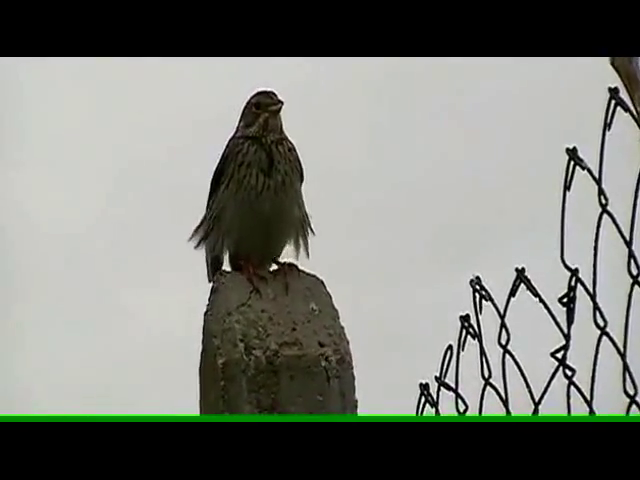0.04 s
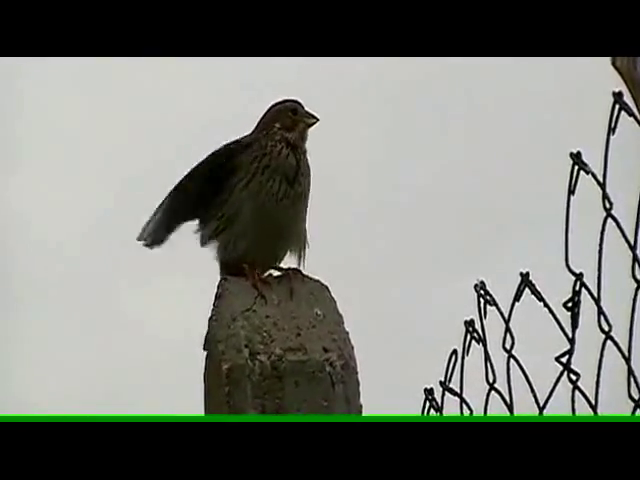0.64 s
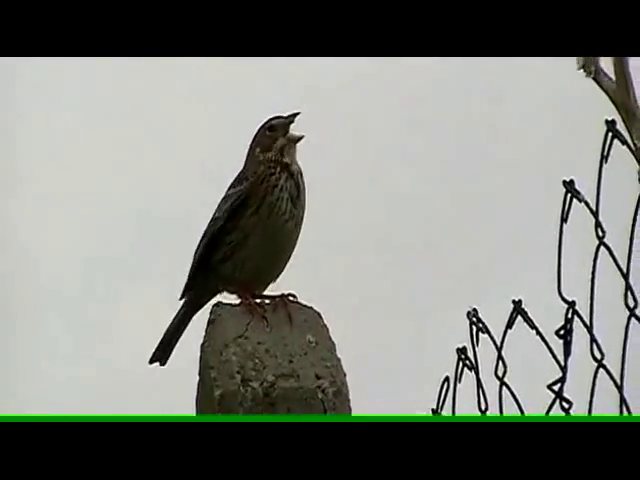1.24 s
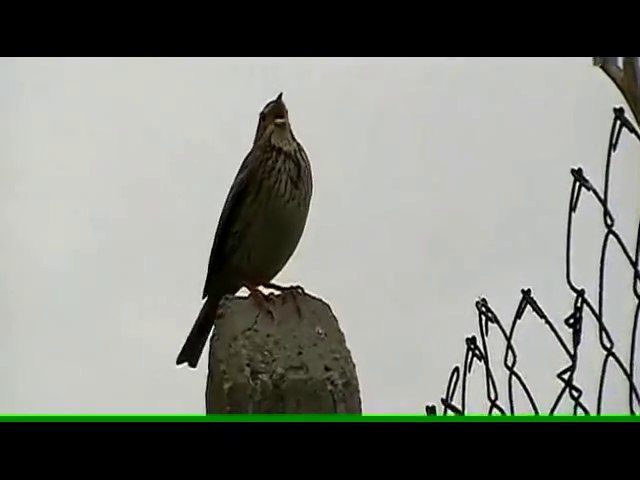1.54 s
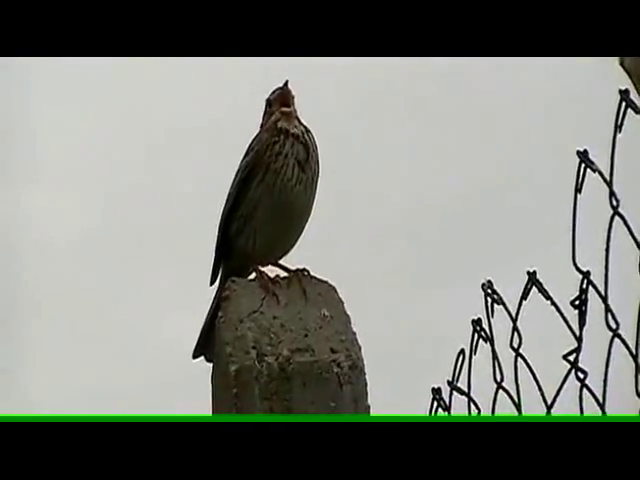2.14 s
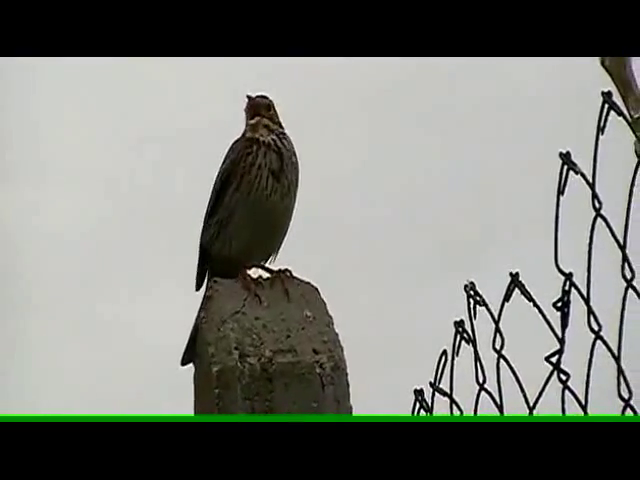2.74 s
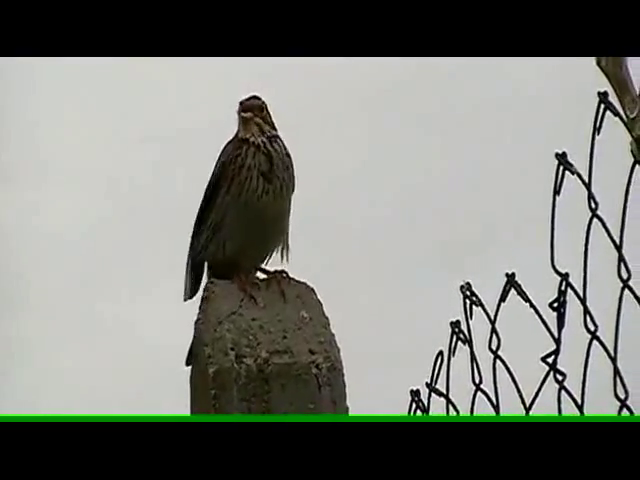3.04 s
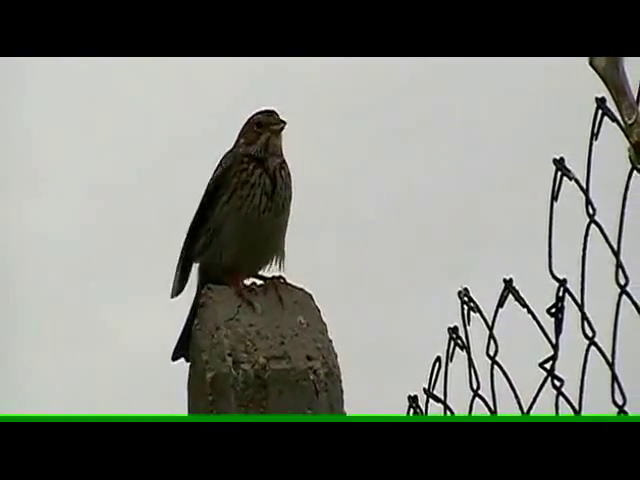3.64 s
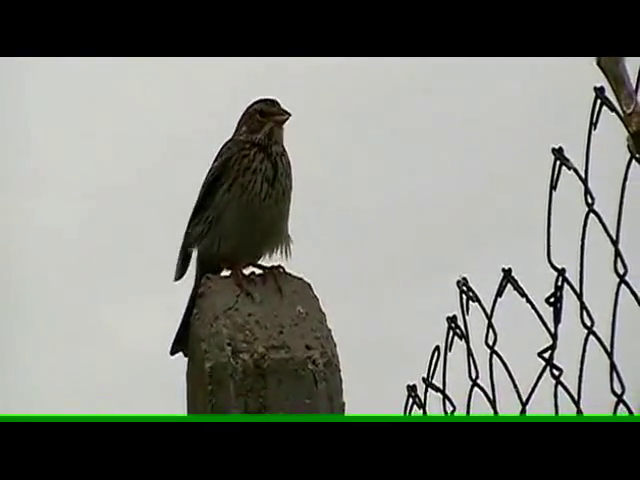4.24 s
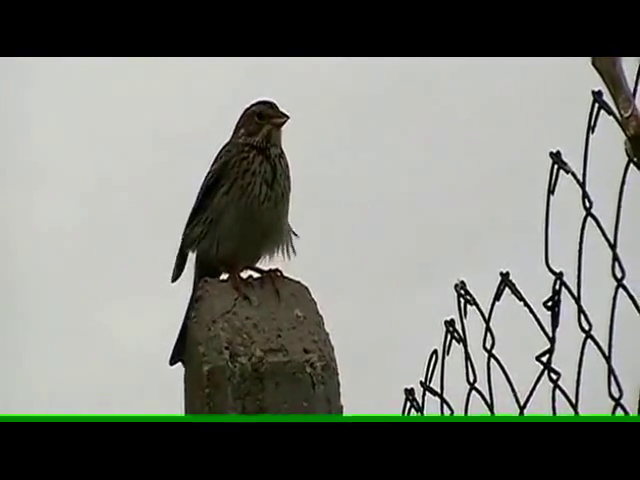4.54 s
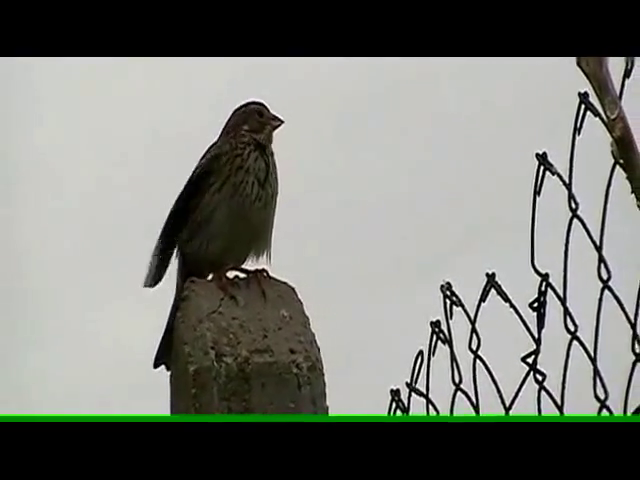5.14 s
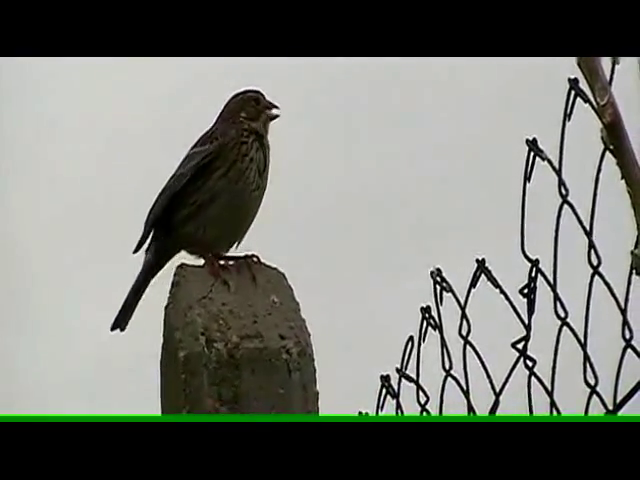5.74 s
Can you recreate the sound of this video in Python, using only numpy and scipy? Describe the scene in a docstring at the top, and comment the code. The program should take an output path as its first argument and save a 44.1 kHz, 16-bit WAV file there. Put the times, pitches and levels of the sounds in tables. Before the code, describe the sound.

A small bird sings close to the microphone in an open field. At about 0.3 seconds it flicks a wing with one faint, fluttering swish. Sharp, high ticks begin at 0.8 seconds and speed up, breaking at 1.7 seconds into a loud, dense jangle of chips, slides and buzzes. A fast warble follows around 2.3 seconds, then bright clinks at 2.6 and falling sweeps from 3 seconds. From about 3.6 to 4.1 seconds the song ends in a softer, slowing trill with a little more echo. After a pause, two new ticks come at 5.6 and 5.9 seconds. Far birds twitter faintly throughout, with thin whistles and pips from about 4.6 seconds. A distant road hums quietly underneath, and light gusts now and then rumble softly on the microphone.

```python
"""In an open field, a corn bunting on a concrete post flicks a wing and sings. Sharp ticks speed up into
a jangle of slides and buzzes from both sides of its syrinx (a bird's two-sided voice box), then come
a warble, clinks and sweeps. It turns its head away for the slowing trill, so nearby echoes take over,
then starts ticking again. Far larks and a distant road lie behind; light gusts touch the microphone."""
import sys
import numpy as np
from scipy import signal
from scipy.fft import rfft, irfft
from scipy.io import wavfile
from scipy.ndimage import uniform_filter1d, map_coordinates

SR = 44100
rng = np.random.default_rng(int(sys.argv[2]) if len(sys.argv) > 2 else 0)


def inscribe(sig):
    """Save sig as 16-bit PCM at rate SR to the path in sys.argv[1].

    A 1-D sig is mono; a 2-D sig holds one channel per row.
    Samples are clipped to [-1, 1] before scaling.
    """
    pcm = np.round(np.clip(np.atleast_2d(sig).T, -1, 1) * 32767)
    wavfile.write(sys.argv[1], SR, pcm.astype(np.int16))


N = 264600
TIME = np.arange(N) / SR
OPPOSITE = np.array([[1], [-1]])   # plus in the left channel, minus in the right
UPPER_VOICE_HZ = 6500   # buzzes above this pitch belong to the upper of the bird's two voices


def from_db(db):
    """Turn decibels into a number to multiply a sound by."""
    return 10 ** (np.asarray(db) / 20)


def unit_power(x):
    """Scale a sound so that its average power is 1."""
    return x / np.sqrt(np.mean(x ** 2) + 1e-20)


def in_time(rows):
    """Join rows of (time, values...) with straight lines, giving each value at every sample."""
    times, *columns = np.transpose(rows)
    return [np.interp(TIME, times, column) for column in columns]


def drift(per_s, size):
    """A smooth random wobble, roughly 1 either way, that finds per_s new values a second."""
    points = np.random.default_rng(rng.integers(1 << 30)).standard_normal(int(size * per_s / SR) + 4)
    return map_coordinates(points, [np.arange(size) * per_s / SR + 1], order=3, mode="nearest")


def noise(colour):
    """Noise of power 1; its colour (rows of f/Hz, level/dB) sets how strong the lows and highs are."""
    hz, db = np.transpose(colour)
    bins = np.maximum(np.fft.rfftfreq(N, 1 / SR), 1)
    gain = from_db(np.interp(np.log(bins), np.log(hz), db))
    low_cut = bins / np.hypot(bins, hz[0] / 2)
    return unit_power(irfft(rfft(rng.standard_normal(N)) * gain * low_cut, N))


def add(track, start_s, sound):
    """Mix a sound into a track at the given time."""
    start = max(int(start_s * SR), 0)
    track[start:start + len(sound)] += sound[:max(N - start, 0)]


def progress(length_s):
    """Count from 0 to 1 over the samples of a note."""
    return np.linspace(0, 1, max(int(length_s * SR), 32))


def series(start_s, gap_s, level_db, count, fade_db=0, slowing_s=0):
    """Rows of t/s, level/dB for a repeated note: gaps grow by slowing_s, levels drop by fade_db."""
    k = np.arange(count)
    return np.column_stack([start_s + gap_s * k + slowing_s * k * (k - 1) / 2, level_db - fade_db * k])


def echoes(x, decay_s, per_s, width, first_s=.002):
    """Scattered echoes that fall 60 dB in decay_s; width sets how much left and right differ."""
    t = np.arange(SR // 2) / SR
    strengths = rng.standard_normal((2, len(t)))
    arrives = (rng.random(len(t)) < per_s / SR) & (t > first_s)
    patterns = strengths * arrives * from_db(-60 * t / decay_s)
    mid, side = [signal.fftconvolve(x, taps / np.sqrt(taps @ taps + 1e-20))[:N] for taps in patterns]
    return mid + width * side * OPPOSITE


def syrinx(hz, gain, waver=0.018, shimmer_db=1.37, octave_db=-27):
    """One vibrating membrane in the voice box: a slightly shaky tone with a weak octave above it."""
    size = len(hz)
    phase = 2 * np.pi * np.cumsum(hz * (1 + waver * drift(900, size))) / SR
    soft_ends = signal.windows.tukey(size, min(1, .0032 * SR / size))
    octave = from_db(octave_db) * (hz < SR / 4) * np.sin(2 * phase)
    shimmer = from_db(shimmer_db * drift(500, size))
    return np.sqrt(2) * gain * soft_ends * shimmer * (np.sin(phase) + octave)


def repeat_note(rows, shape, length_s, waver=0.019):
    """Sing one shape at each t/s, level/dB. A shape's position runs from 0 (note starts) to 1 (ends)."""
    out = np.zeros(N)
    position, hz, db = np.transpose(shape)
    along = progress(length_s)
    pitch = uniform_filter1d(np.interp(along, position, hz), size=30)
    for s, level_db in rows:
        add(out, s, syrinx(pitch, from_db(level_db + np.interp(along, position, db)), waver))
    return out


def slides(rows, arch_db, bend_hz, waver):
    """Notes that glide in a curve from one pitch to another and are loudest in the middle."""
    out = np.zeros(N)
    for s, length_s, start_hz, end_hz, level_db in rows:
        along = progress(length_s)
        arch = 1 / 6 - (2 * along - 1) ** 2
        pitch = start_hz + (end_hz - start_hz) * along + bend_hz * arch
        add(out, s, syrinx(pitch, from_db(level_db + arch_db * arch), waver))
    return out


def buzzes(rows, arch_hz=600, arch_db=6, full_swing_hz=480, slow_per_s=75, wander_hz=80):
    """A fast flutter swings the pitch and pulses the air; a small swing leaves a nearly pure note."""
    out = np.zeros(N)
    for s, length_s, centre_hz, swing_hz, per_s, level_db in rows:
        along = progress(length_s)
        arch = 1 / 4 - (2 * along - 1) ** 2
        swell_db = 2 if centre_hz > UPPER_VOICE_HZ else 7.5
        flutter = 2 * np.pi * np.cumsum(per_s * (1 + .15 * drift(170, len(along)))) / SR
        rough = min(swing_hz / full_swing_hz, 1)
        depth = min(rough ** 2 + (slow_per_s / per_s) ** 2, 1)   # slow flutter breaks into pulses
        pulses = 1 + depth * np.cos(flutter + 0.28)
        flow = pulses * from_db(swell_db * along + arch_db * arch * (1.5 - rough))
        pitch = centre_hz + swing_hz * np.sqrt(rough) * np.sin(flutter) + arch_hz * arch * (1 - rough)
        pitch += wander_hz * rough * drift(110, len(along))
        add(out, s, syrinx(pitch, from_db(level_db) * unit_power(flow), waver=0.032 * rough ** 2))
    return out


def road(side_db=-10, whine_hz=2192, whine_db=-71):
    """The background hum of a distant road, with a thin steady whine in it."""
    # how loud the background hum is; it dips briefly during the loud song: t/s, relative level/dB
    hum_levels = [(0.0, -55.5), (1.61, -54.5), (2.22, -62.5), (2.55, -55), (4.91, -50), (5.87, -52),
                  (5.9, -52)]
    # colour of the hum: f/Hz, level/dB
    colour = [(60, -18.5), (440, -8.5), (560, 1.5), (690, 1), (750, -3.5), (880, 3.5), (970, -7),
              (1110, 5.5), (1300, -3), (1550, 2), (2100, -8.5), (4500, -17.5), (7000, -27.5)]
    level_db, = in_time(hum_levels)
    hum = noise(colour) + from_db(side_db) * noise(colour) * OPPOSITE
    whine = np.sqrt(2) * from_db(whine_db) * np.sin(2 * np.pi * whine_hz * TIME)
    return (from_db(level_db + 0.5) * hum + whine) * from_db(-.6 * OPPOSITE)   # a little to the right


def wind(calm_db=-63.5, gust_s=.1, mid_db=-11):
    """Swirls of air push on the microphone's two openings, mostly in opposite directions."""
    # gusts that rise and die equally fast: t/s, peak level/dB
    gusts = [(.15, -54.5), (.45, -49), (2.0, -46), (2.57, -45.5), (3.22, -44), (4.5, -49)]
    # colour of the wind's rumble: f/Hz, level/dB
    colour = [(25, -11), (100, -2.5), (300, -9), (700, -39)]
    strength = from_db(calm_db) + sum(from_db(db) * np.exp(-np.abs(TIME - s) / gust_s) for s, db in gusts)
    swirls = noise(colour) * np.array([[.9], [-1.1]]) + from_db(mid_db) * noise(colour)
    bumps_db = 4 * drift(28, N)
    return strength * from_db(bumps_db) * swirls


def throb(level_db=-60, band_hz=(270, 380)):
    """A soft low throbbing comes and goes under the middle of the song."""
    band = signal.butter(2, band_hz, "band", fs=SR, output="sos")
    hum = signal.sosfilt(band, rng.standard_normal((2, N)))
    swell = np.exp(-((TIME - 2.9) / 0.93) ** 4)
    return from_db(level_db) * unit_power(hum) * swell * np.abs(drift(33, N))


def wandering_whistle(centre_hz, wander_hz, turns_per_s, swell_db):
    """An unbroken whistle that wanders in pitch and strength, blurred by echoes."""
    gain = from_db(swell_db * np.tanh(drift(turns_per_s / 2, N)))
    whistle = syrinx(centre_hz + wander_hz * drift(turns_per_s, N), gain)
    return echoes(unit_power(whistle), decay_s=0.18, per_s=1100, width=0.37)


def far_twitter(rise_db_per_s=2.5):
    """Far birds keep up a high twitter that slowly grows."""
    level_db = -69 + rise_db_per_s * (TIME - TIME.mean())
    return from_db(level_db) * wandering_whistle(4750, wander_hz=259, turns_per_s=52, swell_db=4)


def chatter():
    """A faint chatter near 3.3 kHz rises under the middle of the song."""
    # how loud the chatter is: t/s, level/dB
    levels = [(0, -71.5), (2.3, -71), (2.65, -54.5), (3.75, -54), (4.0, -72), (6, -65)]
    level_db, = in_time(levels)
    return from_db(level_db) * wandering_whistle(3250, wander_hz=190, turns_per_s=90, swell_db=10)


def far_birds(chirp_hz=3480, fall_hz=380):
    """Lark whistles, a run of short chirps and a neighbouring bird's pips, blurred by distance."""
    # lark whistles: t/s, length/s, start f/Hz, end f/Hz, bend/Hz, relative level/dB
    lark_notes = [(4.61, 0.09, 4180, 3660, 150, -52), (4.792, 0.18, 4396, 4130, -120, -55),
                  (5.217, 0.041, 4610, 4400, -120, -55), (5.534, 0.056, 4470, 4100, -59, -59),
                  (5.692, 0.059, 3970, 4510, 100, -57), (5.762, 0.045, 4100, 3620, -130, -51.5),
                  (5.944, 0.04, 3700, 3390, -54, -57)]
    # the neighbour's pips: t/s, relative level/dB
    pips = [(5.68, -47), (5.771, -42.5), (5.840, -36), (5.905, -33), (5.963, -40.5)]
    # shape of one pip: position, f/Hz, level/dB
    pip_shape = [(0, 5200, -11), (0.202, 4750, 4), (1, 4780, -13.5)]
    whistles = sum(slides([(s, length_s, start_hz, end_hz, db)], arch_db=6, bend_hz=bend_hz, waver=0.011)
                   for s, length_s, start_hz, end_hz, bend_hz, db in lark_notes)
    run = series(start_s=5.245, gap_s=.11, level_db=-57.5, count=4)
    pitches = chirp_hz + 110 * rng.standard_normal(len(run))
    chirp_notes = [(s, .03, hz, hz - fall_hz, db) for (s, db), hz in zip(run, pitches)]
    chirps = slides(chirp_notes, arch_db=10, bend_hz=0, waver=0.024)
    calls = whistles + chirps + repeat_note(pips, pip_shape, length_s=0.015)
    return 0.9 * calls + 0.89 * echoes(calls, decay_s=0.058, per_s=1100, width=0.69)


def wing(peak_s=0.2835, rise_s=0.016, fall_s=0.056, level_db=-50.5, flutter_db=4):
    """Feathers slide over one another in one short, fluttering swish."""
    # colour of the rubbing feathers: f/Hz, level/dB
    feathers = [(2500, -30), (3600, -2), (4400, 1), (6000, -11.5), (8000, -19.5), (10000, -12)]
    since = TIME - peak_s
    stroke = np.exp(np.minimum(since / rise_s, -since / fall_s))
    return from_db(level_db + flutter_db * drift(140, N)) * stroke * noise(feathers)


def ticks():
    """Sharp ticks open the song; in each, the pitch dives and comes partway back up."""
    # the ticks: t/s, level/dB
    notes = [(.8238, -19.5), (1.0645, -15), (1.2455, -11.5), (1.3955, -10.5), (1.556, -10.5),
             (1.6505, -11.5), (5.6485, -22.5), (5.880, -15.5)]
    # shape of one tick: position, f/Hz, level/dB
    shape = [(0, 8600, -7.5), (.18, 8050, -8.5), (.35, 6000, -1.5), (.5, 4900, 1), (0.662, 5720, -1),
             (.85, 6770, -4.5), (1, 6300, -4.5)]
    return repeat_note(notes, shape, length_s=.011, waver=0.041)


def jangle(under_hz=5420, under_swing_hz=340, under_db=-28.5, fade_db_per_s=5.5, slowest_per_s=150):
    """Three chips, then hooks, slides and buzzes; the lower voice flutters under each high buzz."""
    # shape of one falling chip: position, f/Hz, level/dB
    chip_shape = [(0, 8880, -15), (.16, 7960, -1), (.33, 6000, -10), (.48, 5160, -2), (.72, 5450, 2),
                  (1, 5300, -9.5)]
    # hooks, short rising notes of the upper voice: t/s, level/dB
    hook_notes = [(1.742, -13.5), (1.8705, -17), (2.016, -19.5), (2.049, -16), (2.187, -13.5)]
    # shape of one hook: position, f/Hz, level/dB
    hook_shape = [(0, 7260, -5), (.25, 7890, 1), (.55, 7650, -0.5), (1, 8696, -2.5)]
    # slides of the lower voice: t/s, length/s, start f/Hz, end f/Hz, level/dB
    slide_notes = [(1.82, .014, 7240, 4580, -15), (1.866, 0.015, 4960, 5800, -20),
                   (1.999, 0.0097, 6190, 4880, -19), (2.018, 0.016, 5460, 5010, -19.5),
                   (2.034, 0.014, 6420, 4930, -20.5), (2.144, .0085, 5820, 4870, -18),
                   (2.152, 0.013, 8200, 4810, -18), (2.516, .014, 5030, 4990, -19),
                   (2.581, 0.018, 5530, 5290, -12.5), (2.859, 0.029, 5270, 4867, -16.5),
                   (2.897, 0.017, 4975, 5620, -17), (3.563, 0.034, 5080, 5040, -33.5)]
    # buzzes: t/s, length/s, centre f/Hz, swing/Hz (small ones are narrowed), flutter/Hz, level/dB
    buzz_notes = [(1.75, .046, 4830, 312, 460, -25), (1.804, .017, 6120, 695, 250, -29),
                  (1.835, .028, 4830, 330, 480, -27), (1.887, 0.053, 8050, 590, 307, -17.5),
                  (1.942, 0.046, 5040, 275, 420, -21), (2.068, 0.075, 7770, 1590, 430, -32),
                  (2.171, 0.02, 5410, 473.7, 280, -21.5), (2.202, .05, 5406, 311, 334, -18),
                  (2.552, 0.026, 5450, 317, 330, -13.5), (3.155, 0.11, 7130, 1130, 380, -31),
                  (3.264, 0.039, 5570, 410, 270, -27.5), (3.306, 0.059, 6270, 764, 400, -27.5),
                  (3.362, .15, 7290, 230, 68, -33.5)]
    high = [(s, length_s, per_s) for s, length_s, hz, _, per_s, _ in buzz_notes if hz > UPPER_VOICE_HZ]
    middle_s = np.mean([s for s, _, _ in high])
    under = []
    for s, length_s, per_s in high:
        db = under_db - fade_db_per_s * (s - middle_s)
        under.append((s, length_s, under_hz, under_swing_hz, max(per_s, slowest_per_s), db))
    chip_notes = series(start_s=1.679, gap_s=0.02555, level_db=-11.5, count=3)
    chips = repeat_note(chip_notes, chip_shape, length_s=.0128)
    hooks = repeat_note(hook_notes, hook_shape, length_s=0.01188)
    glides = slides(slide_notes, arch_db=3.5, bend_hz=-450, waver=0.012)
    return chips + hooks + glides + buzzes(buzz_notes) + buzzes(under)


def warble(length_s=.018, centre_hz=5410, uneven_hz=80, flutter_per_s=410):
    """The lower voice repeats one note that rises and falls, getting louder and purer."""
    notes = series(start_s=2.2665, gap_s=.0208, level_db=-23.5, fade_db=-0.67, count=12)
    swings = np.linspace(230, 140, len(notes))
    chance = rng.standard_normal((len(notes), 2))
    rows = [(s, length_s, centre_hz + uneven_hz * higher, swing * from_db(2 * wider), flutter_per_s, db)
            for (s, db), swing, (higher, wider) in zip(notes, swings, chance)]
    return buzzes(rows, arch_hz=750, arch_db=5.5)


def tinkles(length_s=.0095, first_hz=7790, fall_hz=150, sink_hz_per_s=1240):
    """Above the warble, the upper voice sings tiny notes that sink in pitch."""
    # two groups of three, then four fading notes: t/s, gap/s, level/dB, fade per note/dB, count
    groups = [(2.255, 0.01, -15, 0.5, 3), (2.306, .0118, -18, -0.5, 3), (2.360, .024, -16, 3, 4)]
    first_s = groups[0][0]
    notes = []
    for start_s, gap_s, level_db, fade_db, count in groups:
        for s, db in series(start_s, gap_s, level_db, round(count), fade_db):
            hz = first_hz - sink_hz_per_s * (s - first_s)
            notes.append((s, length_s, hz, hz - fall_hz, db))
    return slides(notes, arch_db=3.5, bend_hz=-300, waver=.019)


def clinks(early_s=0.011, lead_length_s=0.018, lead_db=-24, lead_fade_db=5.5):
    """The lower voice leads in softly, the upper one falls partway, and the lower one ends the fall."""
    # the upper voice's part of a clink: position, f/Hz, level/dB
    upper_shape = [(0, 8650, -10), (.15, 7960, -5.5), (.38, 7400, 1), (1, 6920, -11)]
    # the lower voice's part: position, f/Hz, level/dB
    lower_shape = [(.42, 7200, -34), (.5, 6820, 0), (.6, 5300, -2), (.78, 5250, -2.5), (1, 5260, -17)]
    notes = series(start_s=2.622, gap_s=.035, level_db=-12, fade_db=0.56, slowing_s=.0013, count=6)
    lead_notes = [(s - early_s, lead_length_s, 5800, 4950, lead_db - lead_fade_db * k)
                  for k, (s, _) in enumerate(notes)]
    leads = slides(lead_notes, arch_db=5, bend_hz=-400, waver=0.026)
    upper = repeat_note(notes, upper_shape, length_s=0.01367)
    lower = repeat_note(notes, lower_shape, length_s=.021)
    return leads + upper + lower


def sweeps(start_s=2.953, gap_s=.0618, answer_s=0.0187, answer_hz=5450, swing=300, flutter_per_s=130):
    """The upper voice falls four times, the lower answers at twice the pace; two quick falls follow."""
    # shape of one fall: position, f/Hz, level/dB
    shape = [(0, 9000, -7.5), (.13, 7930, -5.5), (.35, 7100, 0.5), (.7, 6700, -5.5), (1, 6240, -2.5)]
    long_notes = series(start_s, gap_s, level_db=-17, fade_db=1.5, count=4)
    quick_notes = series(start_s=3.462, gap_s=0.043, level_db=-25, fade_db=4.5, count=2)
    beats = series(start_s - gap_s / 2, gap_s / 2, level_db=-28, count=9)
    long_falls = repeat_note(long_notes, shape, length_s=0.021)
    quick_falls = repeat_note(quick_notes, shape, length_s=0.0104)
    answers = buzzes([(s, answer_s, answer_hz, swing, flutter_per_s, db) for s, db in beats])
    return long_falls + quick_falls + answers


def trill(extra_gap_s=.01686, change_at_note=11.84, change_notes=.51, uneven_db=1.5):
    """One falling note repeats ever more slowly; near the end the bird drops to a still slower pace."""
    # shape of one trill note: position, f/Hz, level/dB
    shape = [(0, 8180, -30), (.2, 7850, -1), (.5, 7090, 3.5), (.75, 5700, 8.5), (1, 4860, -10.5)]
    s, db = series(start_s=3.5802, gap_s=.01939, level_db=-36.5, fade_db=-0.1027,
                   slowing_s=.00079, count=18).T
    slowed = 1 / (1 + np.exp((change_at_note - np.arange(len(s))) / change_notes))   # goes from 0 to 1
    late_s = extra_gap_s * (np.cumsum(slowed) - slowed)
    levels_db = db + uneven_db * rng.standard_normal(len(s))
    return repeat_note(zip(s + late_s, levels_db), shape, length_s=0.014)


def rasp(song, below_song_db=34):
    """Air rushing through the syrinx lays a faint hiss under the notes."""
    effort = np.sqrt(np.abs(uniform_filter1d(song ** 2, size=200)))
    hiss = noise([(1500, -7), (3300, -2), (4200, -3), (6000, 2.5), (10000, -16.5)])
    return from_db(-below_song_db) * effort * hiss


def bunting(beak_hz=3900, field_db=-34):
    """The whole song, heard directly, off nearby surfaces as the head turns, and across the field."""
    # what turning the head does: t/s, near echoes over direct sound/dB, left over right/dB
    head_turn = [(1.2, -27.5, 1.5), (1.9, -12.5, 2.5), (2.8, -13, 2), (3.1, -4.5, 1), (4.1, 0, 2),
                 (5.6, -25.5, -2.5)]
    song = ticks() + jangle() + warble() + tinkles() + clinks() + sweeps() + trill()
    beak = signal.butter(2, beak_hz, "high", fs=SR, output="sos")   # a small beak sends out no lows
    song = signal.sosfilt(beak, song)
    song += rasp(song)
    echo_db, pan_db = in_time(head_turn)
    direct = song / np.hypot(1, from_db(echo_db))   # weaker as the echoes take over
    near = echoes(direct * from_db(echo_db), decay_s=0.1, per_s=1600, width=0.63)
    field = from_db(field_db) * echoes(song, decay_s=0.54, per_s=811, width=0.58)
    return (direct + near + field) * from_db(OPPOSITE * pan_db / 2)


def scene():
    """The singer in its field."""
    return bunting() + wing() + far_birds() + chatter() + far_twitter() + road() + wind() + throb()


def record(dry, cutoff_hz=10450):
    """The recorder steeply cuts away the highest sounds."""
    return signal.sosfilt(signal.ellip(10, .2, 70, cutoff_hz, fs=SR, output="sos"), dry)


dry = scene()
out = record(dry)
inscribe(out)
```